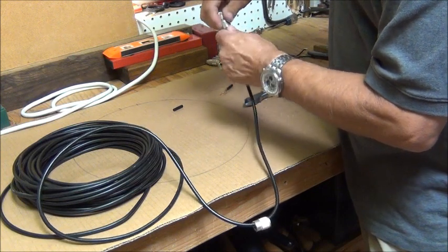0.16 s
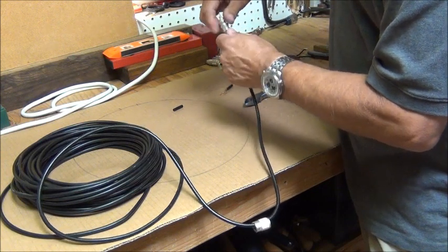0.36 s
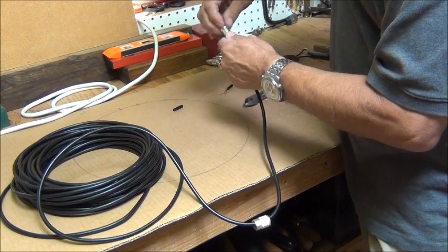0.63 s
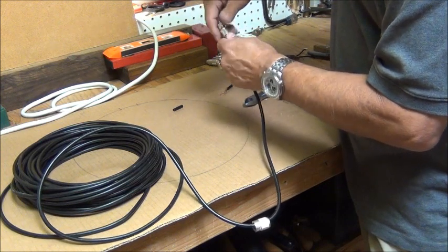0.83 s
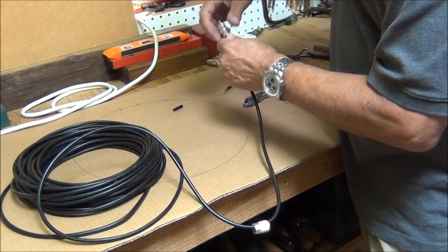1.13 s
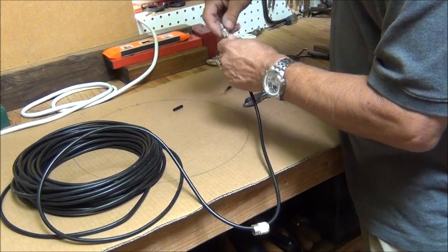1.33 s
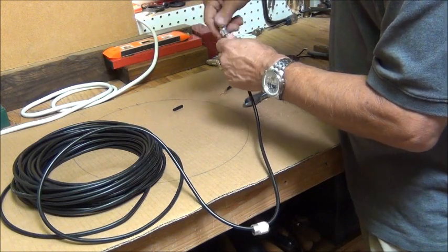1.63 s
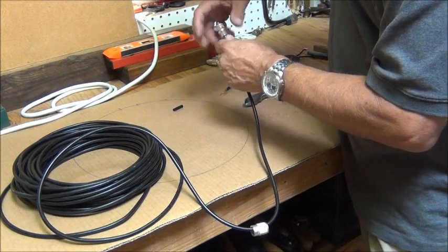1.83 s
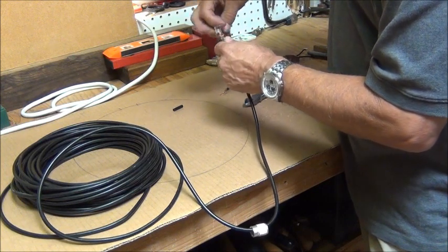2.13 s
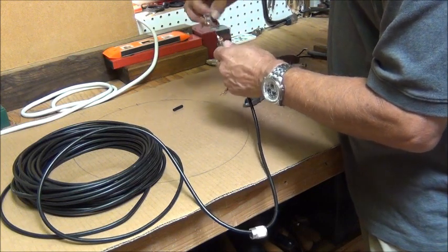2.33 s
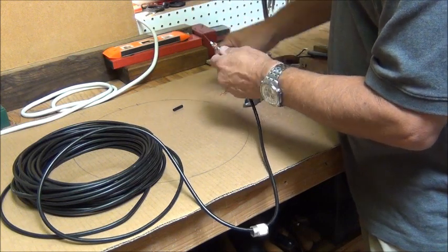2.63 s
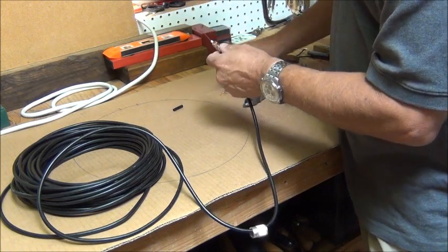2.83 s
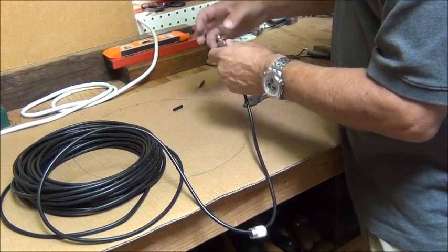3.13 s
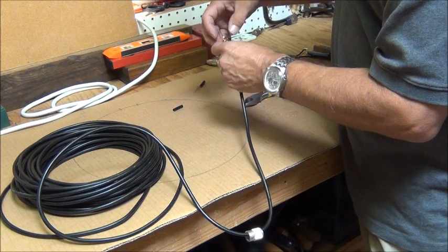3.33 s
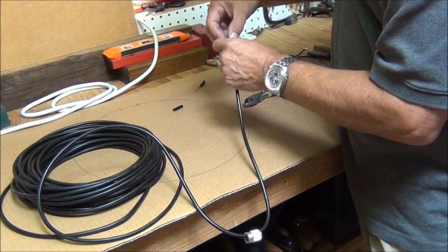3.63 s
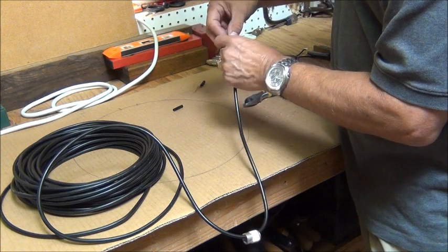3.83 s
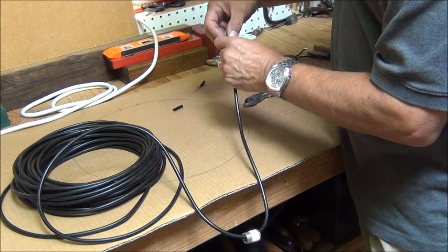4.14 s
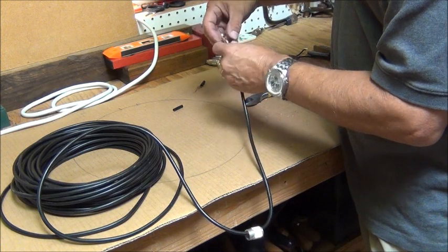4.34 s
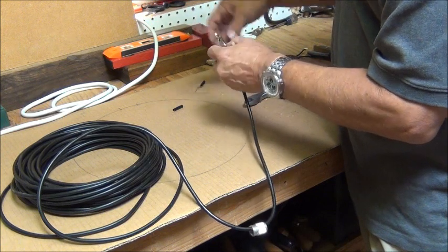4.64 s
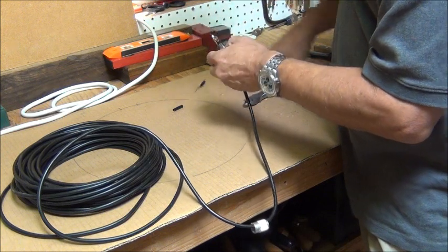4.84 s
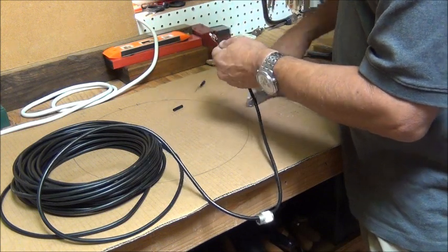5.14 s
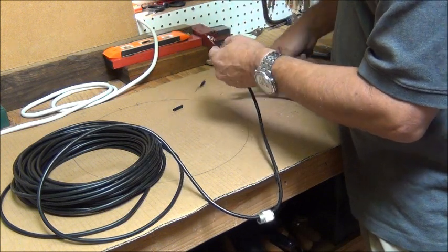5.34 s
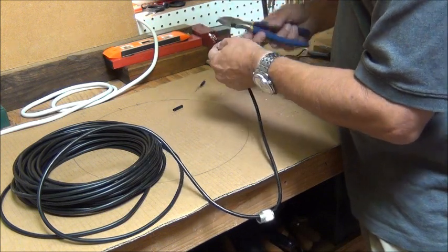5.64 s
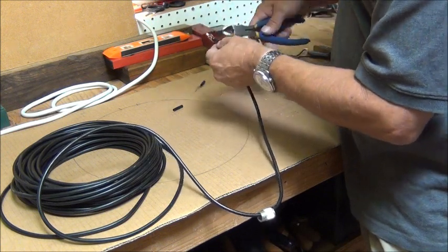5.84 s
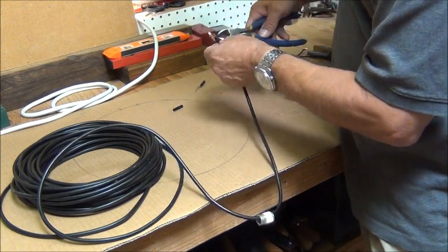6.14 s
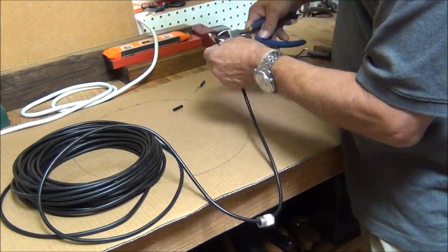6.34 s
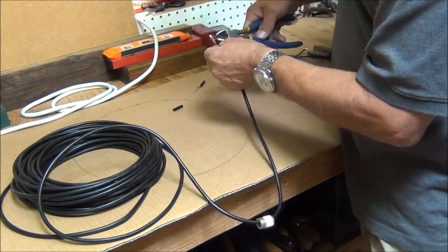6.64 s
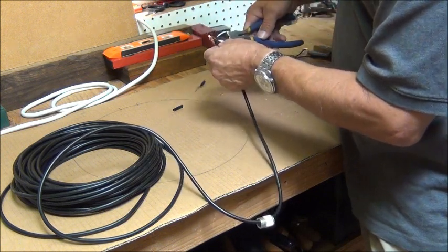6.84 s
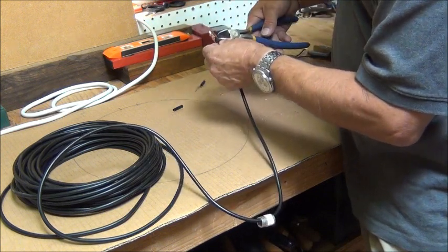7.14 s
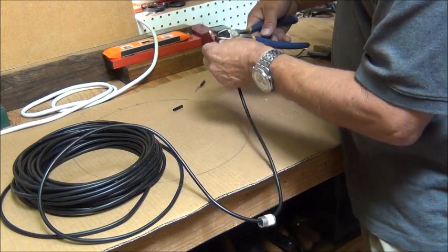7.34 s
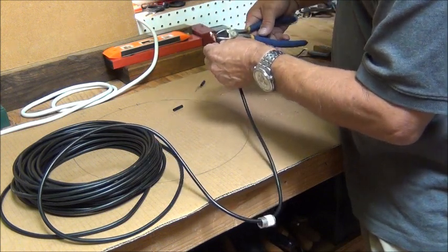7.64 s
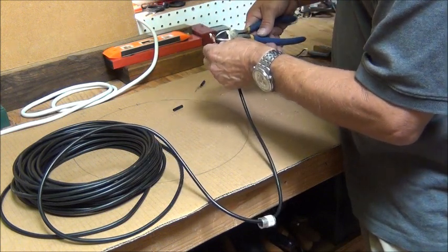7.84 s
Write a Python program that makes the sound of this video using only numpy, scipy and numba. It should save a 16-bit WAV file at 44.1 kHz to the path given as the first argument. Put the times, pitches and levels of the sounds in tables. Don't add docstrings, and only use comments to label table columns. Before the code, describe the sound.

A small indoor workshop, heard from a metre away by a camcorder: steady soft hiss, a low distant fan, a very high thin whine and brief faint lens-motor whines. From 0.25 to 2.45 s, connector threads tick brightly and irregularly, with light finger rustles and tiny squeaky chirps near 1.5 and 2.4 s. At 2.95-3.2 s a steel tool clatters, knocks and scrapes on the wooden bench, ringing shortly. Crisp fingernail clicks follow at 3.24-3.6 s. At 4.18 s an offcut lands with the loudest crack, then bounces and rattles until about 4.45 s; a small sleeve clinks at 4.5 s. From 4.95 s come soft bumps, tool clacks and scraping, then a loose board drumming at 5.2-5.3 s, quickly stilled. One sharp, bright cutter snip sounds at 5.77 s. Then hiss remains, with only faint ticks around 7 s.

```python
import sys
import numpy as np
from scipy import signal
from scipy.fft import rfft, irfft
from scipy.io import wavfile
from scipy.ndimage import uniform_filter1d
from numba import njit

SR = 44100
rng = np.random.default_rng(int(sys.argv[2]) if len(sys.argv) > 2 else 0)


def voltage_ratio(decibels):
    exponent = np.asarray(decibels, float) / 20
    return 10 ** exponent


def wrap_up_sound(samples):
    columns = np.atleast_2d(samples).T
    tamed = np.clip(columns, -1, 1)
    steps = np.round(tamed * 32767).astype(np.int16)
    wavfile.write(sys.argv[1], SR, steps)


N = 351873


def level(x, db):
    return x * voltage_ratio(db) / np.sqrt(np.mean(x ** 2))


def band(x, lo_hz, hi_hz, order=2):
    edges = np.clip([lo_hz, hi_hz], 20, .45 * SR)
    return signal.sosfilt(signal.butter(order, edges, "band", fs=SR, output="sos"), x)


def fade(t, t60):
    return np.exp(-np.log(1000) * t / np.maximum(t60, .002))


def walk(rate):
    k = int(SR / rate)
    steps = np.repeat(rng.standard_normal(N // k + 1), k)
    return level(uniform_filter1d(steps, k)[:N], 0)


def add(out, s, db, sound, pan_db=0):
    i = int(s * SR)
    sound = sound[:N - i] * voltage_ratio(db) / np.abs(sound).max()
    out[:, i:i + len(sound)] += sound * voltage_ratio(np.array([[pan_db], [-pan_db]]) / 2)


def ring(modes, t, scatter_db, detune, count=1):
    hz, db, t60 = np.transpose(modes)[:, :, None, None]
    chance = rng.standard_normal((2, len(hz), count, 1))
    pitch = 2 * np.pi * hz * (1 + detune * chance[0])
    phase = pitch.astype(np.float32) * t.astype(np.float32)
    strength = voltage_ratio(db + scatter_db * chance[1]).astype(np.float32)
    clusters = (strength * np.sin(phase)).sum(axis=1)
    return (clusters * fade(t, t60[:, 0])).sum(axis=0) / np.sqrt(count)


def ticks(rows):
    # f/Hz, level/dB, t60/s
    connector = [(3145, -4.5, 0.0059), (5200, -5.5, .05), (6300, -9, 0.046), (8500, -7, 0.084),
                 (9510, 0, 0.061), (11100, 1, 0.047), (12200, -4, 0.055), (14000, -10, .04)]
    out, t = np.zeros((2, N)), np.arange(SR // 8) / SR
    for s, db, hz, t60, pan_db in sorted(rows):
        noise = rng.standard_normal(len(t))
        noise[0] = -voltage_ratio(8)
        crack = band(noise, hz / 1.13, hz * 1.09, order=1)
        crack = crack * (fade(t, t60 / 5) + 0.32 * fade(t, t60))
        modes = ring(connector, t, 5, .025, count=3)
        modes = band(modes, hz / 1.5, hz * 1.5, order=1) * fade(t, .55 * t60)
        add(out, s, db, band(crack, hz / 2.44, SR) + voltage_ratio(-13.0) * modes, pan_db)
    return out


def blows(table, modes, low_hz, crack_db, crack_s, chatter_db, scatter_db, detune, count):
    out, t = np.zeros((2, N)), np.arange(SR // 4) / SR
    for s, db, contact_ms, rattle_s in table:
        body = ring(modes, t, scatter_db, detune, count)
        body = body + voltage_ratio(crack_db) * rng.standard_normal(len(t)) * fade(t, crack_s)
        chatter = rng.standard_normal(len(t)) ** 3 * fade(t, 4 * rattle_s)
        push = voltage_ratio(chatter_db) * chatter / np.sqrt(SR / 100)
        push[0] = 1
        top_hz = max(1000 / contact_ms, 1.63 * low_hz)
        sound = signal.fftconvolve(body, push)[:len(t)]
        sound = band(sound, low_hz, top_hz, order=3)
        add(out, s, db, band(sound, 1.22 * low_hz, SR))
    return out


def scrapes(strokes, low_hz, split_hz, high_hz, stutter_db, grit_db):
    grit = rng.standard_normal((2, N)) * voltage_ratio(stutter_db * walk(90) + grit_db * walk(900))
    treble = level(band(grit[0], split_hz, high_hz), 0)
    body = level(band(grit[1], low_hz, split_hz), 0)
    out, t = 0, np.arange(N) / SR
    for s, db, rise_s, fall_s, body_db in strokes:
        times = [s - max(rise_s, .001), s, s + max(fall_s, .001)]
        pressure = np.interp(t, times, [0, 1, 0]) ** 2.4
        out = out + pressure * voltage_ratio(db) * (treble + voltage_ratio(body_db) * body)
    return out


def thread_and_nail_ticks():
    # t/s, level/dB, f/Hz, left minus right/dB
    turns = [(0.2694, -42, 7990, -3), (0.287, -32, 12200, -2), (0.7343, -34, 11500, -1),
             (0.7626, -15.5, 12800, 1), (0.9916, -21.5, 14300, 2), (1.0774, -32, 14000, 0),
             (1.347, -34, 9440, 3), (1.373, -27, 13600, 3), (1.4172, -33, 8000, -.5),
             (1.487, -22.5, 10500, 3), (1.501, -17.5, 11200, -6), (1.729, -30, 12400, 0),
             (1.765, -37, 12800, 0), (1.804, -23, 10600, -.5), (1.8382, -23, 8900, 2), (2.07, -28, 8000, 1),
             (2.174, -33, 12000, 5), (2.295, -28.5, 11100, -.5), (2.387, -23, 12500, -7),
             (2.429, -23, 11200, 2)]
    # t/s, level/dB, f/Hz, left minus right/dB
    picks = [(3.242, -14, 12000, 0), (3.31, -27.5, 9200, -.5), (3.332, -9.5, 12400, 2),
             (3.434, -24.5, 13300, -3), (3.454, -31, 10200, -2), (3.4845, -35, 9800, 0),
             (3.525, -26.5, 10100, -2), (3.5568, -32, 11100, -.5), (3.58, -29, 11800, 0),
             (3.9569, -31.5, 10800, 0), (7.0668, -35, 11000, 0), (7.1681, -32, 12300, -.5)]
    ring_s = 0.029
    return ticks([(s, db, hz, ring_s, pan_db) for s, db, hz, pan_db in turns + picks])


def thread_chirps():
    squeaks = [(1.419, -34, 11200, 0.0026), (1.44, -41, 5900, 0.022), (1.49, -34, 5160, 0.013),
               (1.5023, -28, 6210, 0.0057), (1.504, -35, 5200, 0.013), (1.5025, -30, 11000, 0.0042),
               (1.523, -37, 12500, .004), (2.35, -27, 11370, .006), (2.353, -27, 11700, .005),
               (2.356, -40, 6600, .016), (2.362, -28, 12800, 0.0065), (2.364, -36, 8900, .005),
               (2.3665, -33, 13300, .003), (2.378, -31, 8500, 0.0052), (2.3783, -43, 4830, 0.004),
               (2.39, -26, 10600, .004), (2.391, -25, 8800, 0.0059), (2.392, -29, 12200, .004),
               (2.39, -30, 4940, .004), (2.403, -30, 11400, .003), (2.434, -28, 11200, 0.0034),
               (2.4344, -38, 4740, 0.0053)]
    glide, roughness = 0.0295, 0.83
    out = np.zeros((2, N))
    for s, db, hz, length_s in squeaks:
        u = np.linspace(-1, 1, int(max(length_s, .002) * 2 * SR))
        slipping = uniform_filter1d(rng.standard_normal(SR // 10), size=16)[:len(u)] * 4
        tone = np.sin(2 * np.pi * np.cumsum(hz * (1 + glide * u)) / SR)
        add(out, s - length_s, db, np.exp(-4 * u ** 2) * (1 + roughness * slipping) * tone)
    return out


def treble_rustles():
    strokes = [(.254, -54, 0.054, 0.099, 1), (.668, -53.5, 0.065, 0.11, -1), (.745, -48, 0.056, 0.018, 1.5),
               (.77, -47, .003, .02, 8), (.925, -54, 0.0027, 0.022, 8), (1.45, -47, 0.076, .05, -1),
               (1.482, -46, 0.023, .005, -4), (1.505, -39, .003, 0.053, -10), (1.77, -48.5, .05, 0.069, -4),
               (1.83, -49, 0.065, .05, 2), (2.184, -51.5, 0.32, 0.16, 0), (2.37, -42.5, .03, 0.034, -6),
               (2.393, -37, 0.009, 0.035, -5), (2.435, -46, 0.0032, 0.018, -10),
               (3.247, -46, .003, .015, -16), (3.025, -30, 0.037, 0.064, -18),
               (3.162, -30, .004, .015, -11), (3.21, -31, 0.02, .065, -13), (3.3, -46, 0.065, .008, -9),
               (3.337, -39, 0.0033, 0.01, -2), (3.345, -53, .005, .04, -4), (5.584, -48, 0.067, 0.067, -19),
               (5.898, -48, 0.044, 0.069, -9)]
    return scrapes(strokes, low_hz=3720, split_hz=9300, high_hz=14300, stutter_db=1.0, grit_db=3.5)


def small_slips():
    # t/s, level/dB, f/Hz, ring/s
    touches = [(0.2955, -35, 11000, .01), (0.35, -39, 12200, .01), (0.358, -39, 12000, .01),
               (0.5576, -37, 13900, .01), (0.559, -38, 8500, .01), (0.652, -38, 4600, .01),
               (0.705, -36, 7500, .01), (0.7365, -31, 5300, .015), (2.9558, -32, 9240, .015),
               (3.02, -21, 5000, .02), (3.0875, -23, 4500, .012), (3.109, -17, 3300, 0.014),
               (3.166, -32, 5500, .015), (4.181, -23.5, 6000, 0.013), (4.57, -27, 3000, 0.014),
               (4.2395, -32, 3600, 0.017)]
    return ticks([(*row, 0.5) for row in touches])


def ferrule_clinks():
    # t/s, level/dB, contact/ms, rattle/s
    contacts = [
        (4.5067, -20.5, 0.039, 0.0017),
        (4.572, -21.5, 0.058, 0.0022),
    ]
    # f/Hz, level/dB, t60/s
    rim = [(6300, -19, .05), (9250, -9, .04), (12120, -16, .04), (14000, 1, .06)]
    # f/Hz, level/dB, t60/s
    flank = [(9050, -5, .05), (9300, -1, .06), (10440, -6, .03), (12110, -1, .08), (14030, -10, .06)]
    out = 0
    for contact, modes in zip(contacts, (rim, flank)):
        out = out + blows([contact], modes, low_hz=3600, crack_db=0, crack_s=0.033, chatter_db=-6,
                          scatter_db=-4.5, detune=0.0032, count=2)
    return out


def clacks():
    # t/s, level/dB, f/Hz, ring/s
    claps = [(0.9216, -21, 3300, 0.054), (0.922, -25, 5400, .012), (4.383, -30, 4480, 0.025),
             (4.433, -30, 6200, .02), (2.968, -13, 2940, 0.037), (2.991, -18, 2920, 0.063),
             (3.074, -12.5, 2900, .066), (3.11, -16, 5960, 0.02), (3.1757, -11, 4360, 0.029),
             (3.179, -18, 3200, 0.14), (4.979, -34, 5270, .04), (5.1118, -19, 3550, 0.032),
             (5.13, -21, 4400, .04), (5.145, -9, 4630, 0.063), (5.155, -14, 2220, .04),
             (5.159, -15, 2100, 0.056), (5.167, -16, 2400, .04), (5.2993, -17.5, 4240, 0.032),
             (6.96, -31.5, 5900, .053), (7.2459, -44, 2740, .04)]
    return ticks([(*row, 0.5) for row in claps])


def tool_scrapes():
    strokes = [(2.972, -35, .003, 0.017, -7), (3.037, -36, 0.12, 0.03, 2), (3.062, -35, 0.018, 0.013, -4),
               (3.078, -29, 0.0034, 0.042, 0), (3.115, -38, .003, 0.076, 8),
               (3.167, -34, 0.031, 0.0059, -4), (4.184, -44, 0.0026, 0.039, -2),
               (4.395, -59, .015, 0.074, 18), (4.96, -60, 0.024, 0.087, 6), (5.066, -53, 0.056, .05, 5.5),
               (5.113, -29.5, 0.0039, 0.021, 2), (5.129, -31.5, 0.0033, 0.031, 4),
               (5.147, -29, 0.0023, 0.035, 1), (5.163, -40, 0.02, 0.027, 1),
               (5.185, -31.5, 0.025, 0.03, -4), (5.21, -31.5, 0.019, 0.1, -3.5),
               (5.26, -44, .06, 0.053, -1.5), (3.0, -41.5, 0.028, .05, 3), (3.14, -48, 0.027, 0.036, 4),
               (5.304, -52, 0.034, 0.015, 14.5), (1.5, -65, 0.23, 0.2, 12.5),
               (1.83, -66.5, 0.14, 0.12, 13.5), (5.31, -59.5, 0.0091, 0.046, 15)]
    return scrapes(strokes, low_hz=1330, split_hz=3740, high_hz=15200, stutter_db=3.0, grit_db=1.0)


def tool_landings():
    # t/s, level/dB, contact/ms, rattle/s
    hits = [
        (2.968, -21.5, 0.33, 0.0028),
        (3.074, -21, 0.34, 0.0049),
        (3.109, -31, 0.37, 0.0044),
    ]
    # f/Hz, level/dB, t60/s
    steel = [(1680, -1, 0.068), (2900, -1.5, 0.32), (3750, -14, .08), (4940, -15, .05)]
    return blows(hits, steel, low_hz=1200, crack_db=10.0, crack_s=0.07, chatter_db=2.0,
                 scatter_db=1.0, detune=0.0049, count=2)


def bench_knocks():
    # t/s, level/dB, contact/ms, rattle/s
    hits = [(2.968, -13.5, 0.91, 0.018), (2.991, -17, 0.9, 0.026), (3.02, -23, 2.1, 0.035),
            (3.074, -10, 1.08, 0.038), (3.109, -14.5, 1.07, 0.017), (3.14, -23, 1.8, 0.015),
            (3.176, -42, 2.5, 0.087), (4.19, -30, 3.8, 0.28), (4.38, -30.5, 3.8, 0.019),
            (4.44, -31, 4.5, 0.048), (4.695, -33.5, 1.45, 0.016), (4.942, -26, 2.95, 0.04),
            (4.98, -27.5, 7.9, 0.013), (5.036, -27.5, 1.5, 0.015), (5.06, -31, 4.7, 0.0067),
            (5.111, -24, 1.06, 0.021), (5.146, -27, 2.9, 0.026), (5.769, -35, .9, .008)]
    # f/Hz, level/dB, t60/s
    wood = [(133, -50, 0.11), (166.2, -4.5, 0.71), (207, -19, 0.4), (264.4, -13, 0.35), (304, -4, 0.1),
            (384, 1.5, 0.1), (443, 0.5, 0.12), (477, -3.5, 0.29), (572.6, 4, 0.19), (650, -3.5, 0.036),
            (724, -4.5, .06), (850, -11.5, 0.11), (1150, 1.5, 0.096)]
    return blows(hits, wood, low_hz=144.4, crack_db=23.5, crack_s=0.011, chatter_db=-6.0,
                 scatter_db=4.0, detune=0.0477, count=7)


def offcut_bounces():
    # t/s, level/dB, contact/ms, rattle/s
    bounces = [(4.1805, 1, 0.23, 0.0045), (4.184, -7.5, 0.31, 0.014), (4.192, -10, 0.62, 0.011),
               (4.203, -17, 0.43, 0.014), (4.214, -15, 1.2, 0.018), (4.24, -15.5, 0.55, 0.0048),
               (4.251, -15.5, 1.26, 0.007), (4.262, -30, 0.87, .02), (4.28, -28, 1.4, 0.044),
               (4.312, -27, 1.6, 0.045), (4.347, -18, 0.95, 0.0083), (4.359, -14, 0.95, 0.012),
               (4.378, -8.5, 0.35, 0.0031), (4.384, -5.5, 0.54, 0.012), (4.39, -12, 0.78, 0.0087),
               (4.402, -17, 0.83, 0.028), (4.432, -8, 0.52, 0.0023), (4.438, -12.5, 0.86, 0.0061),
               (4.452, -19, 1.3, 0.015), (4.49, -43, 1, .02), (4.523, -35, 0.77, 0.11),
               (4.579, -37, 1.4, 0.02)]
    # f/Hz, level/dB, t60/s
    shelf = [(363, -14, 0.69), (496, -15, 0.99), (570, -1, 0.31), (664, -5.5, 0.23), (830, -4, 0.22),
             (1120, -18, 0.16), (1402, 1.5, 0.11), (1590, -15, 0.059), (1824, 4.5, 0.055),
             (2256, 7.5, 0.031), (2670, 8, 0.037), (3156, 9, 0.075), (3630, -1, .07), (5600, -26, .015)]
    sound = blows(bounces, shelf, low_hz=304, crack_db=29.0, crack_s=0.021, chatter_db=0.5,
                  scatter_db=1.0, detune=0.0698, count=24)
    return band(sound, 60, 4000)


def cutter_snip():
    # t/s, level/dB, contact/ms, rattle/s
    bites = [
        (5.7675, -36, 0.065, .001),
        (5.769, -11, 0.088, 0.0014),
        (5.7695, -6.5, .07, .001),
        (5.77, -4.5, .07, .001),
        (5.7719, -11, 0.1, 0.0022),
        (5.775, -14.5, 0.092, .006),
    ]
    # f/Hz, level/dB, t60/s
    steel = [(960, 20, 0.045), (2680, 5, .065), (3130, 3.5, 0.071), (3870, -6, 0.046), (4780, -6, 0.075),
             (5600, -19, .03), (6380, -4, .03), (7040, -4, .03), (8000, 4.5, 0.058), (9300, 2, .045),
             (9800, 0, .02), (11400, -15, 0.023), (12400, -10, .025), (14500, -4, .012)]
    return blows(bites, steel, low_hz=1800, crack_db=21, crack_s=.02, chatter_db=-14,
                 scatter_db=2.5, detune=.06, count=40)


def board_rocks():
    # t/s, level/dB, contact/ms, rattle/s
    hits = [
        (5.218, -10.5, 1.74, 0.01),
        (5.231, -14, 0.8, 0.0051),
        (5.243, -11.5, 1.47, 0.01),
        (5.248, -20, 7, .012),
        (5.262, -15, 3, 0.0072),
        (5.279, -14, 1.5, 0.0084),
        (5.303, -18.5, 2.5, 0.0068),
        (5.312, -20.5, 7, 0.014),
        (5.32, -28, 2.8, 0.0075),
    ]
    # f/Hz, level/dB, t60/s
    board = [(131, -18, 0.14), (173.2, -6.5, 0.54), (231, 1.5, 0.075), (258.8, -9, 0.22), (337, -3.5, 0.15),
             (392, -1.5, 0.11), (442, -8.5, 0.14), (518, -11, .08), (595, 3, 0.061), (752, -7, .06),
             (1012, -8, 0.088), (1145, -2, 0.078), (1400, -12, .06)]
    return blows(hits, board, low_hz=111.5, crack_db=21, crack_s=0.017, chatter_db=-3.5,
                 scatter_db=3.5, detune=0.0308, count=2)


def steel_skids():
    strokes = [
        (3.179, -42, .003, .053, 8),
        (3.2, -50, .019, .046, 11),
        (5.771, -33, .002, .07, 2),
        (4.38, -48, .002, .04, 10),
        (4.433, -52, .002, .03, 12),
        (0.922, -54, .001, .04, 6),
        (5.23, -40, .03, .04, -4),
    ]
    return scrapes(strokes, low_hz=2000, split_hz=4300, high_hz=11500, stutter_db=1.5, grit_db=2.5)


def frame_thuds():
    # t/s, level/dB, contact/ms, rattle/s
    pushes = [
        (4.945, -42, 6.5, 0.026),
        (5.04, -42, 5.7, 0.036),
        (5.22, -37, 3.4, 0.028),
        (5.29, -33, 7.3, 0.023),
    ]
    # f/Hz, level/dB, t60/s
    frame = [(44, 9, .3), (61.6, -5, .3), (88, 1, 0.2), (112, 13, 0.19)]
    return blows(pushes, frame, low_hz=35, crack_db=3, crack_s=.03, chatter_db=-11,
                 scatter_db=-3, detune=0.039, count=2)


def bench_hums():
    # t/s, level/dB, contact/ms, rattle/s
    shifts = [
        (3.088, -25, 1.5, 0.013),
        (3.121, -22, 1.6, .01),
        (3.16, -37, 5, 0.025),
        (4.6, -44.5, 5, 0.038),
        (4.69, -42, 5, 0.035),
        (5.345, -31.5, 3, 0.018),
        (5.375, -35, 5, 0.043),
    ]
    # f/Hz, level/dB, t60/s
    plank = [(165.1, 0, 0.41), (254.6, -8, .3), (380, 4, 0.14), (445, 9, .12), (550, 1, 0.13)]
    return blows(shifts, plank, low_hz=120, crack_db=3, crack_s=.01, chatter_db=-4,
                 scatter_db=2.5, detune=.015, count=3)


def palm():
    start_s, hold_s = 5.341, .1
    times = start_s + np.array([0, .006, hold_s, 2 * hold_s])
    return voltage_ratio(-20 * np.interp(np.arange(N) / SR, times, [0, 1, 1, 0]))


def room(dry):
    t = np.arange(SR // 2) / SR
    echo = rng.standard_normal((3, len(t)))
    echo = echo[0] + 0.9 * band(echo[1:], 1000, 26000, order=1)
    low = band(echo, 180, 1800, order=1) * fade(t, 0.23)
    high = band(echo, 2000, 24000, order=1) * fade(t, 0.15)
    echo = (low + high) * np.minimum(t / 0.0016, 1)
    echo = echo / np.sqrt((echo ** 2).sum() / 2)
    return voltage_ratio(-6) * signal.fftconvolve(dry, echo, axes=1)[:, :N]


def coloured(spectrum, db):
    hz, per_hz_db = np.transpose(spectrum)
    f = np.maximum(np.fft.rfftfreq(N, 1 / SR), 1)
    gain = voltage_ratio(np.interp(np.log(f), np.log(hz), per_hz_db))
    return level(irfft(rfft(rng.standard_normal(N)) * gain, N), db)


def air_fan_and_hiss():
    # f/Hz, level per Hz/dB
    hiss_mid = [(18, -33), (32, -5.5), (45, -0.5), (157, -0.5), (280, -4.5), (900, -8.5), (1520, -13.5),
                (16000, -20.5)]
    # f/Hz, level per Hz/dB
    hiss_side = [(15, -55), (25, -20), (140, -8), (249, -1), (1150, -2.5), (2000, -8.5), (14400, -21.5),
                 (16000, -33)]
    # f/Hz, width/Hz, level/dB
    hz, width, db = (881.4, 61, -56.5)
    duct = []
    for _ in range(2):
        hum = band(rng.standard_normal(N), hz - width / 2, hz + width / 2)
        duct.append(level(hum, db) * voltage_ratio(1.5 * walk(6)))
    mid = coloured(hiss_mid, -47) * voltage_ratio(0.025 * walk(3.3)) + duct[0]
    side = coloured(hiss_side, -53) + 0.14 * duct[1]
    return np.array([mid + side, mid - side])


def line_tone():
    return np.sqrt(2) * voltage_ratio(-66) * np.sin(2 * np.pi * 15734 * np.arange(N) / SR)


def lens_whine():
    # t/s, f/Hz
    motions = [
        [(1.21, 11750), (1.24, 11700), (1.265, 11250), (1.31, 11800), (1.35, 12450), (1.42, 12750),
         (1.5, 12850)],
        [(1.5, 12850), (1.57, 13050), (1.61, 12750), (1.65, 11800), (1.71, 11850), (1.76, 12800), (1.9, 13000),
         (1.96, 11800)],
        [(4.73, 11700), (4.78, 12000), (4.82, 12900), (4.85, 13200), (4.97, 13050)],
    ]
    out, t = 0, np.arange(N) / SR
    for motion in motions:
        s, pitch = np.transpose(motion)
        hz = np.interp(t, s, pitch)
        running = uniform_filter1d(1. * ((t > s[0]) & (t < s[-1])), SR // 400)
        tone = np.sin(2 * np.pi * np.cumsum(hz) / SR)
        out = out + np.sqrt(2) * running * voltage_ratio(-63 + 2 * walk(20)) * tone
    return out


def scene():
    hands = thread_and_nail_ticks() + thread_chirps() + treble_rustles() + small_slips()
    tools = ferrule_clinks() + clacks() + tool_scrapes() + tool_landings()
    tools = tools + offcut_bounces() + cutter_snip() + steel_skids()
    bench = palm() * (bench_knocks() + board_rocks() + frame_thuds()) + bench_hums()
    near = hands + tools + bench
    echoes = palm() ** .3 * room(near)
    return near + echoes + air_fan_and_hiss() + line_tone() + lens_whine()


@njit
def follower(x, attack, release, hold):
    y, e, wait = np.empty(len(x)), 0., 0.
    for i in range(len(x)):
        if x[i] > e:
            e, wait = e + (x[i] - e) * attack, hold
        elif wait > 0:
            wait -= 1
        else:
            e -= e * release
        y[i] = e
    return y


def band_limit(x):
    return signal.sosfilt(signal.butter(12, 16830, fs=SR, output="sos"), x)


def record(dry):
    heard = follower(np.abs(dry).max(axis=0), 1., 1 / (.35 * SR), .6 * SR)
    gain = np.minimum(voltage_ratio(-4.2) / (heard + 1e-9), 1)
    gain = np.roll(gain, SR // 500)
    gain = uniform_filter1d(gain, SR // 500)
    top = signal.ellip(6, .3, 26, 15880, fs=SR, output="sos")
    mix = signal.sosfilt(top, np.clip(dry * gain, -1, 1))
    return band_limit(mix)


dry = scene()
out = record(dry)
wrap_up_sound(out)
```